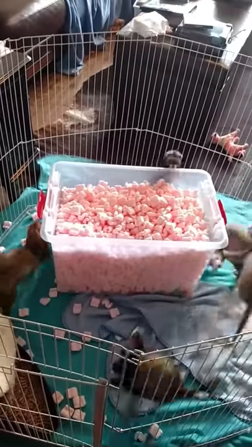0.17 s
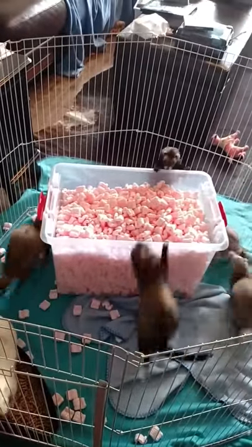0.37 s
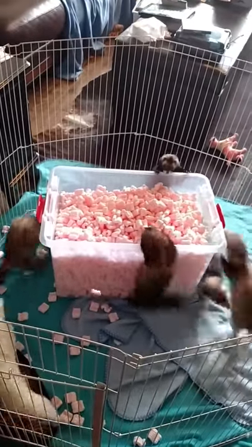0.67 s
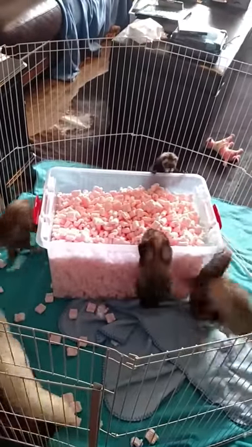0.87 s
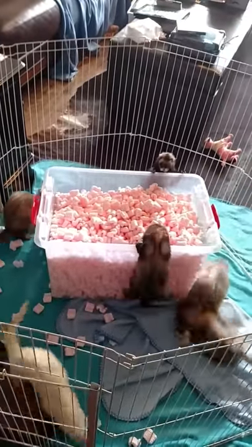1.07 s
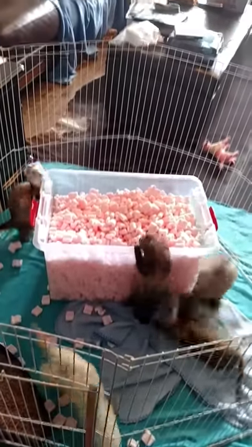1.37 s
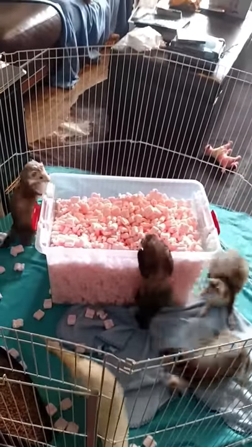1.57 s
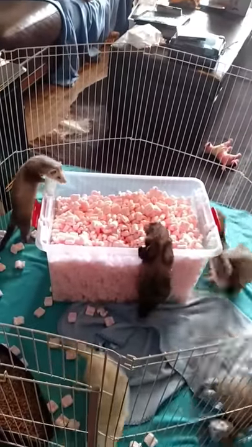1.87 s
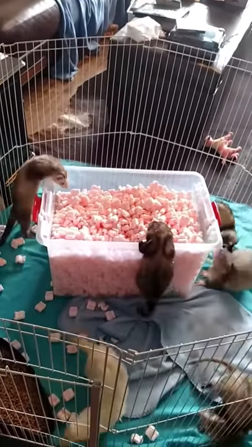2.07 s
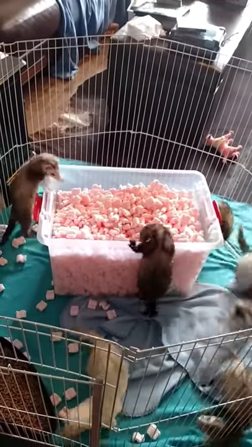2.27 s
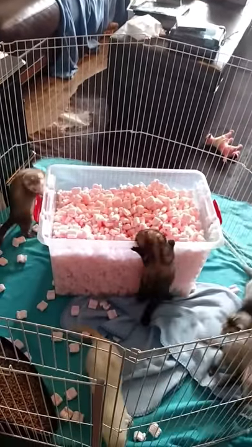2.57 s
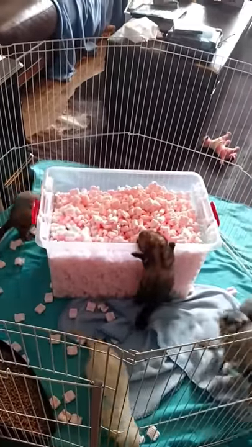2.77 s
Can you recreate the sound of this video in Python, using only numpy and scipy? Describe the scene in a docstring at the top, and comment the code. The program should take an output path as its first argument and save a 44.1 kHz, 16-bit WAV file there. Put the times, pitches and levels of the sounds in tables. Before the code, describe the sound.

Ferrets scrabbling and thumping around a plastic bin, claws clicking, in a quiet small room

```python
"""Ferrets scamper round a plastic bin in a wire pen, in a small room with a quiet tone throughout.
A swish, scrabbling and light patter come first, then thumps and a hard knock with clicks at 0.6 s.
Claws click loudest near 1 s; paws and bodies land in a burst round 1.4 s, then scuff and swish.
Softer knocks and scrabbles follow from 2.1 s. Damped swings make the thumps, knocks and clicks;
filtered noise and tiny random impacts make the rest, and sparse reflections place it in the room."""
import sys
import numpy as np
from scipy import signal
from scipy.io import wavfile

SR = 44100
rng = np.random.default_rng(int(sys.argv[2]) if len(sys.argv) > 2 else 0)


def to_wav(sig):
    """Store sig (one row per channel, or 1-D mono) as 16-bit WAV at the path in sys.argv[1].

    Samples outside -1..1 are clipped; the rate is SR.
    """
    pcm = np.clip(np.atleast_2d(sig), -1, 1) * 32767
    pcm = np.round(pcm).astype(np.int16)
    wavfile.write(sys.argv[1], SR, pcm.T)  # frames by channels


N = 127890  # samples, 2.9 s

# Spectrum of the plastic under the claws: [f/Hz, level/dB]
PLASTIC_COLOUR = [(200, 0), (600, -1), (1050, 0), (1650, 4.5), (2600, -3.5), (3900, -8), (6000, -23),
                  (12000, -20), (16000, -43)]


def amp(db):
    """Decibels to gain."""
    return 10 ** (np.asarray(db) / 20)


def unit(x):
    """Scales to rms 1."""
    return x / np.sqrt(np.mean(x ** 2) + 1e-20)


def read(points, hz):
    """Reads a table on a log-frequency axis."""
    f, value = np.transpose(points)
    return np.interp(np.log(hz + 1), np.log(f + 1), value)


def add(mix, s, sound):
    """Mixes a sound in at time s."""
    part = mix[max(round(s * SR), 0):][:len(sound)]
    part += sound[:len(part)]


def colour(x, points, size=4096):
    """Causal, minimum-phase filter of unit energy with the given spectrum."""
    log_gain = np.log(amp(read(points, abs(np.fft.fftfreq(size, 1 / SR)))))
    spectrum = np.exp(np.conj(signal.hilbert(log_gain)))
    taps = np.fft.ifft(spectrum).real[:size // 2]
    return signal.fftconvolve(x, taps / np.linalg.norm(taps))[:N]


def blow(t, hz, swell_ms, order=1):
    """A heavily damped swing, its envelope full after swell_ms; a higher order starts more softly."""
    u = t * 1000 / swell_ms
    envelope = (u * np.exp(1 - u)) ** order
    return -envelope * np.sin(2 * np.pi * hz * t)


def grains(per_s, spread_db):
    """Tiny impacts at random times, of uneven size and either sign, scaled to rms 1."""
    size = amp(spread_db * np.minimum(rng.exponential(1, N), 4))
    sign = rng.choice([-1, 1], N)
    struck = rng.random(N) < per_s / SR
    return unit(size * sign * struck)


def strokes(table):
    """Pressure of strokes: each swells to its peak and dies away; overlaps add in power."""
    t = np.arange(N) / SR
    power = np.zeros(N)
    for s, db, rise, fall in table:
        swell = (np.minimum(t - s, 0) / rise) ** 2
        decay = np.maximum(t - s, 0) / fall
        power += (amp(db) * np.exp(-swell - decay)) ** 2
    return np.sqrt(power)


def room_tone():
    """Steady noise with the quiet room's spectrum."""
    # Spectrum of the room at rest: [f/Hz, level/dB]
    tone_colour = [(20, -6.5), (69, -8), (145, 1.5), (400, -8.5), (3700, -21), (5300, -31), (9050, -32.5),
                   (12000, -25.5), (15500, -35)]
    tone_db = -57
    return amp(tone_db) * unit(colour(rng.standard_normal(N), tone_colour))


def room(x):
    """Sparse reflections off the small room, starting after 5 ms and dying away quickly."""
    t60_s, reflections_per_s = 0.18, 3000
    t = np.arange(SR // 2) / SR
    arrives = (rng.random(len(t)) < reflections_per_s / SR) * (t > 0.005)
    tail = rng.standard_normal(len(t)) * arrives * amp(-60 * t / t60_s)
    return signal.fftconvolve(x, tail / np.linalg.norm(tail))[:N]


def swishes():
    """Fur and cloth brush past: smooth noise that follows the pressure of each stroke."""
    # Fur and cloth swishing: [peak t/s, level/dB, fall t/s]
    brushes = [(.005, -57.5, 0.037), (.46, -59, 0.012), (.705, -57.5, 0.02), (1.76, -59.5, 0.024),
               (1.889, -54, 0.084), (2.094, -56, 0.042)]
    # Spectrum of fur and cloth: [f/Hz, level/dB]
    swish_colour = [(400, -8), (4500, 2), (7000, -5.5), (11500, 5)]
    rise_s = 0.011
    pressure = strokes([(s, db, rise_s, fall) for s, db, fall in brushes])
    return colour(rng.standard_normal(N) * pressure, swish_colour)


def scuffs():
    """Bodies rub along the covered floor: dense tiny impacts, dulled by the cover."""
    # Bodies scuffing along the floor: [peak t/s, level/dB, rise t/s, fall t/s]
    rubs = [(.682, -44.5, 0.0025, 0.061), (1.226, -53.5, 0.0014, 0.21), (1.685, -48.5, 0.015, 0.037),
            (1.92, -55.5, 0.035, 0.056), (2.503, -51.5, 0.03, 0.053)]
    # Spectrum of the scuffed floor cover: [f/Hz, level/dB]
    scuff_colour = [(80, -4), (250, 8), (950, 2), (3700, -11.5), (5500, -24)]
    return colour(grains(3000, spread_db=3) * strokes(rubs), scuff_colour)


def patter():
    """Light paws run in spells: random small impacts through the dull spectrum of a paw."""
    # Middles of the spells of light running: plain list of peak t/s
    spells = [.2, 1.228, 1.98, 2.57]
    # Spectrum of a paw on the floor: [f/Hz, level/dB]
    paw_colour = [(25, -41.5), (125, -1.5), (250, -3), (400, -11.5), (4000, -71.5)]
    level_db, rise_s, fall_s = -57, 0.2, 0.27
    steps_per_s = 160
    running = strokes([(s, level_db, rise_s, fall_s) for s in spells])
    return colour(grains(steps_per_s, spread_db=0.0) * running, paw_colour)


def pitched_grains(count=12):
    """Tiny catches of the claws, each ringing briefly at one of several pitches."""
    per_s, spread_db = 280, 2  # catches at each pitch, unevenness of size
    swell_cycles = 0.97
    t = np.arange(SR // 40) / SR
    pitches = np.geomspace(750, 4400, count) * rng.uniform(0.95, 1.05, count)
    total = np.zeros(N)
    for hz in pitches:
        ring = blow(t, hz, swell_cycles / hz * 1000)
        ringing = signal.fftconvolve(grains(per_s, spread_db), ring)[:N]
        total += np.sqrt(hz) * unit(ringing)
    return unit(total)


def claw_grip():
    """The claws' grip swings up and down by uneven amounts every few ms."""
    swing_db = 4.2  # largest swing either way, before scaling to rms 1
    turns = np.cumsum(rng.uniform(0.002, 0.007, N // 80))
    up_down = (-1) ** np.arange(len(turns))
    swings = swing_db * up_down * rng.random(len(turns))
    return unit(amp(np.interp(np.arange(N) / SR, turns, swings)))


def scrabbling():
    """Claws catch and slip in quick uneven scratches: ringing grains with a fine crackle."""
    # Claws scrabbling on the plastic: [peak t/s, level/dB, rise t/s, fall t/s]
    scratches = [(.2, -57.5, 0.049, 0.083), (.455, -61, 0.042, 0.14), (.56, -54, 0.0028, .04),
                 (.61, -49.5, 0.02, 0.02), (.65, -48.5, 0.025, 0.02), (.86, -47, 0.063, 0.056),
                 (.959, -46.5, 0.0013, 0.024), (1.078, -50.5, 0.058, 0.05), (1.128, -51, 0.02, 0.049),
                 (1.325, -61, .012, 0.0036), (1.755, -67.5, 0.014, 0.03), (2.093, -55, 0.016, 0.013),
                 (2.622, -58.5, 0.0073, 0.014)]
    crackle_db = 0.5  # against the ringing grains
    crackle = amp(crackle_db) * grains(4000, spread_db=6.0)
    texture = pitched_grains() + crackle
    return colour(texture * claw_grip() * strokes(scratches), PLASTIC_COLOUR)


def ticks():
    """Thin bright ticks, as of claws on the wire: noise bursts with a short sizzling tail."""
    # Bright ticks: [t/s, level/dB]
    taps = [(0.602, -29.5), (0.966, -67), (1.127, -37), (1.2756, -46), (1.565, -51), (2.0835, -48),
            (2.6197, -50)]
    # Spectrum of a tick: [f/Hz, level/dB]
    tick_colour = [(800, -14), (3900, 11), (7000, -3.5), (11300, 6), (14000, 3.5)]
    decay_s, tail_s, tail_db = 0.0014, 0.012, -13.5
    out, t = np.zeros(N), np.arange(SR // 8) / SR
    envelope = np.exp(-t / decay_s) + amp(tail_db) * np.exp(-t / tail_s)
    for s, db in taps:
        add(out, s, amp(db) * rng.standard_normal(len(t)) * envelope)
    return colour(out, tick_colour)


def clicks():
    """A claw catches and lets go: a tiny pitched snap and a clatter of the plastic."""
    # Claws catching on the plastic: [t/s, level/dB, f/Hz]
    catches = [(.149, -42.5, 3170), (.5645, -40, 2040), (.601, -23.5, 2050), (0.6024, -24, 1850),
               (0.814, -40, 1870), (0.8679, -29.5, 2900), (0.967, -23, 3460), (0.967, -21.5, 1950),
               (0.9745, -33, 3460), (.981, -38.5, 3550), (1, -37, 2600), (1.129, -32, 2440),
               (1.2761, -40.5, 2570), (1.459, -41.5, 3000), (1.635, -45.5, 2120), (2.6191, -36, 2870)]
    snap_ms = 0.53
    clatter_db, clatter_s = -12.5, 0.0036  # level against the snap, decay time
    snap, clatter = np.zeros((2, N))
    t = np.arange(SR // 8) / SR
    for s, db, hz in catches:
        add(snap, s, amp(db) * blow(t, hz, snap_ms, order=2))
        burst = rng.standard_normal(len(t)) * np.exp(-t / clatter_s)
        add(clatter, s, amp(db + clatter_db) * burst)
    return snap + colour(clatter, PLASTIC_COLOUR)


def knocks():
    """A body bumps the bin: a short pitched knock, and the wall chatters round the same pitch."""
    # Knocks against the bin: [t/s, level/dB, f/Hz, swell t/ms]
    bumps = [(.3440, -36.5, 574, 1), (0.6013, -21.5, 1310, 0.91), (0.6778, -31, 643, 0.5),
             (1.4106, -31, 1030, 0.53), (1.668, -40.5, 740, 1.4), (2.0833, -40.5, 1000, 1.24),
             (2.089, -49, 1250, 0.3), (2.494, -37.5, 884, 1.6), (2.501, -38, 1050, 1.06),
             (2.62, -33.5, 930, 1.7)]
    chatter_db, chatter_s = -18.5, 0.016  # level against the knock, decay time
    out, t = np.zeros(N), np.arange(SR // 8) / SR
    for s, db, hz, swell_ms in bumps:
        wall = blow(t, hz, 500 / hz)  # swells in half a cycle
        chatter = unit(signal.fftconvolve(rng.standard_normal(len(t)), wall)[:len(t)])
        chatter = amp(chatter_db) * chatter * np.exp(-t / chatter_s)
        add(out, s, amp(db) * (blow(t, hz, swell_ms, order=2) + chatter))
    return out


def thumps():
    """Each landing gives a dull push and rings the bin's walls, most where their pitches are close."""
    # Paws and bodies landing: [t/s, level/dB, f/Hz, swell t/ms]
    landings = [(0.345, -36, 201, 2.3), (.359, -38, 196, 4), (0.4585, -36.5, 246, 2.4),
                (0.581, -41, 241, 3.8), (0.65, -34.5, 158, 1.7), (0.677, -29, 243, 2.06),
                (0.955, -44, 237, 7.1), (1.014, -45, 247, 9.9), (1.159, -38, 229, 6.7),
                (1.3597, -31, 172, 2.9), (1.371, -47, 79.4, 4.3), (1.388, -27.5, 152, 3.2),
                (1.411, -36, 242, 2.4), (1.507, -49, 246, 5.8), (1.761, -41, 90, 2.5),
                (2.008, -35.5, 152, 2.2), (2.048, -42, 227, 3.1), (2.157, -41.5, 253, 2),
                (2.32, -48, 203, 3.6), (2.568, -42.5, 177, 5.5), (2.712, -40, 340, 0.8)]
    # Ringing of the bin's walls: [f/Hz, level/dB, t60/s]
    bin_modes = [(127, -40, 0.15), (238, -10, 0.061), (315.6, -19.5, 0.25)]
    out, t = np.zeros(N), np.arange(SR // 3) / SR
    onset = np.minimum(t / 0.0011, 1)  # the ring fades in over 1.1 ms
    for s, db, hz, swell_ms in landings:
        ring = np.zeros(len(t))
        for f, level, t60 in bin_modes:
            closeness = 1 / (1 + (2 * np.log(f / hz)) ** 2)
            ring -= closeness * amp(level - 60 * t / t60) * np.sin(2 * np.pi * f * t)
        add(out, s, amp(db) * (blow(t, hz, swell_ms) + ring * onset))
    return out


def scene():
    """The animals, their reflections and the room tone."""
    thump_room_db, claw_room_db = -5.5, -12.5  # sent to the reflections
    low = patter() + thumps()
    high = swishes() + scuffs() + scrabbling() + ticks() + clicks() + knocks()
    reflections = room(amp(thump_room_db) * low + amp(claw_room_db) * high)
    return (room_tone() + reflections + low + high)[None]


def record(dry):
    """The recorder's band limit, a steep low-pass."""
    edge_hz = 15700
    low_pass = signal.firwin(511, edge_hz, window=("kaiser", 9), fs=SR)
    return signal.oaconvolve(dry, low_pass[None], "same")


dry = scene()
out = record(dry)
to_wav(out)
```